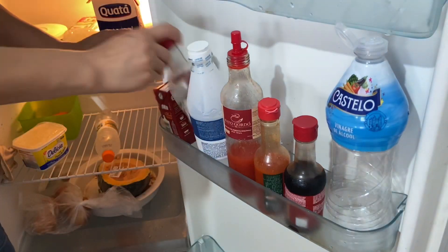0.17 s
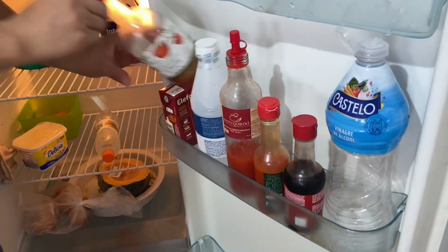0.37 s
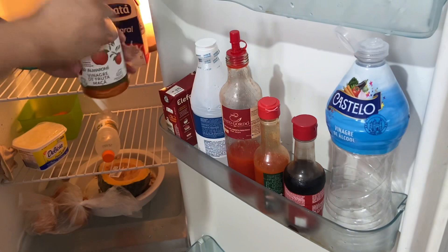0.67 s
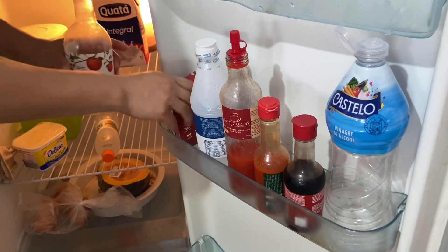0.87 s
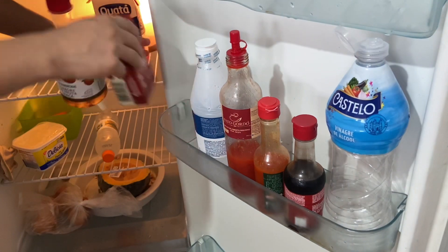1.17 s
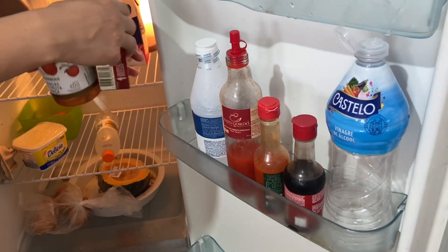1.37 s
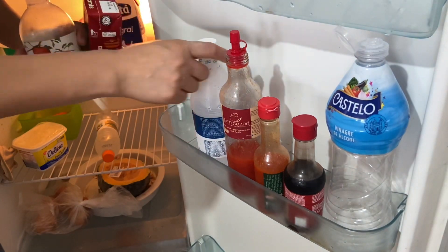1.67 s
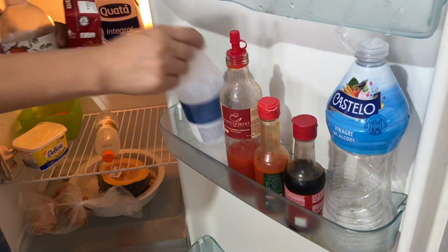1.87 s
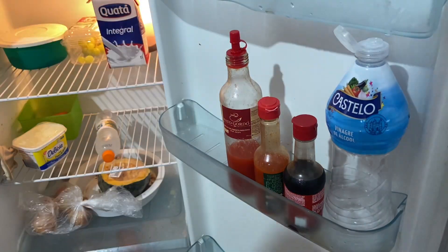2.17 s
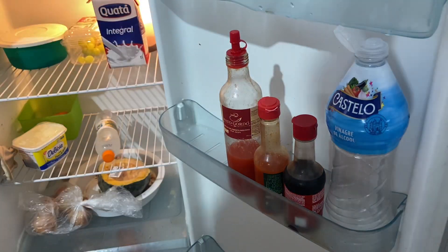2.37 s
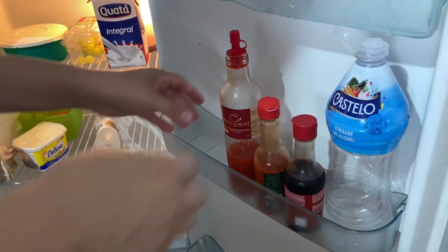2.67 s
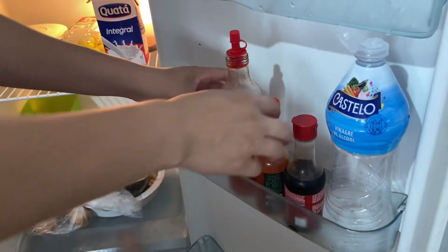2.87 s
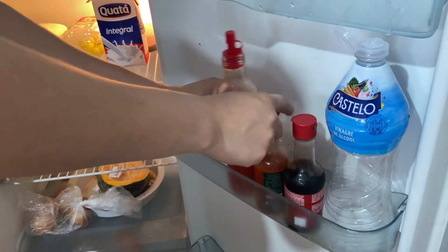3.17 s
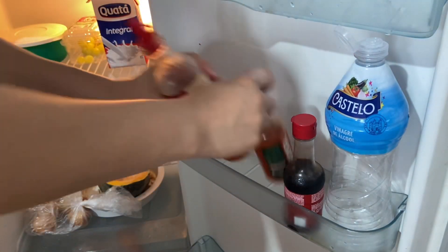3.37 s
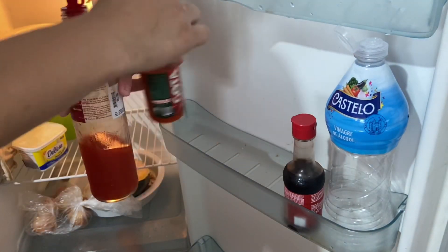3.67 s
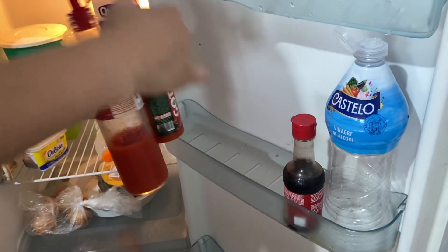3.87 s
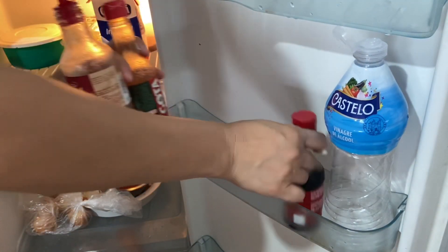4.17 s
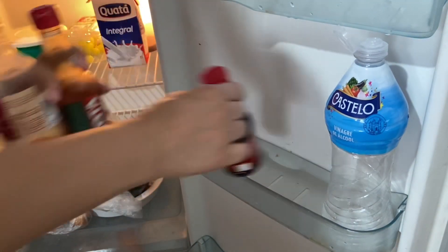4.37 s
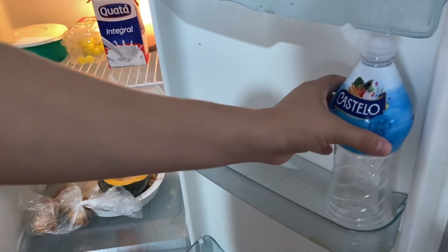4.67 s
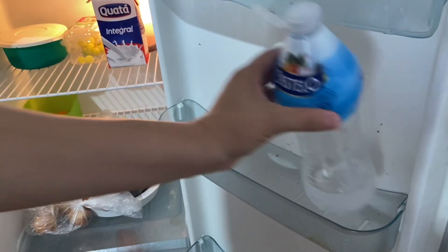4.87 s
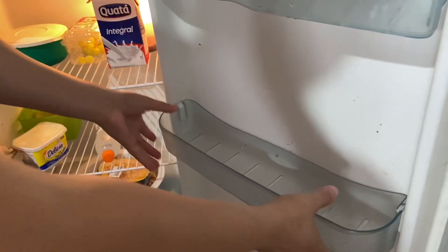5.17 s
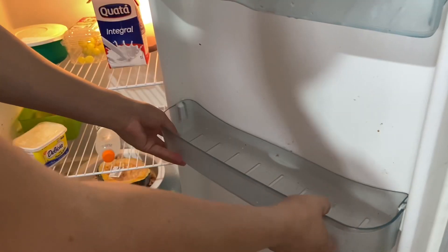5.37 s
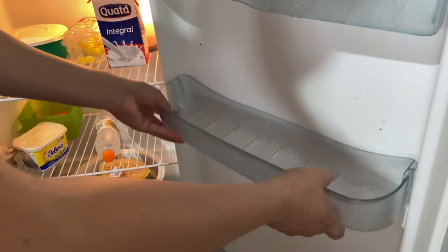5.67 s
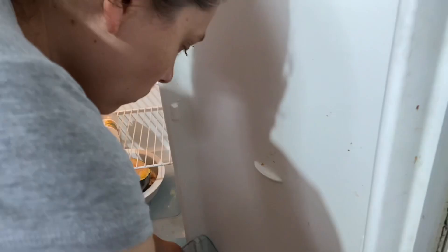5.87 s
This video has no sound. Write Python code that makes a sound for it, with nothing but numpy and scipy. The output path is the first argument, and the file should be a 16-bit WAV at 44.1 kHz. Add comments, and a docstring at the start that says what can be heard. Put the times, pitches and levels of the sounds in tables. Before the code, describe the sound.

Hands empty a refrigerator door rack: plastic knocks and scrapes, a brief glassy clink, then a loud crack as the rack comes loose.

```python
"""In a small tiled kitchen, hands empty the plastic rack of a refrigerator door: jars and bottles scrape out,
knock the rack and each other, two glass bottles clink, and at last the rack itself is worked loose.
Contacts are short forces driving resonances of door, rack and stiff plastic; glass is a sum of decaying sines.
Slides and squeaks are shaped noise, shoves leave the hollow door drumming in noise through its modes,
and a decaying noise tail answers the contacts and glass over a quiet floor."""
import sys
import numpy as np
from scipy import signal
from scipy.fft import rfft, irfft, next_fast_len
from scipy.io import wavfile
from scipy.ndimage import uniform_filter1d, map_coordinates

SR = 44100
rng = np.random.default_rng(int(sys.argv[2]) if len(sys.argv) > 2 else 0)


def unload_wav(signal):
    """Save mono or channel-first audio to the path in sys.argv[1] as 16-bit WAV at rate SR, clipped to [-1, 1]."""
    wavfile.write(
        sys.argv[1],
        SR,
        np.round(np.clip(np.atleast_2d(signal).T, -1, 1) * 32767).astype(np.int16),
    )


N = 265041

# steady murmur of the house, spectral shape: frequency_hz, density_db (relative, per Hz)
QUIET = [(15, -39), (25, -12.5), (49, 11.5), (71, -5), (214, -9), (382, -18), (682, -16.5), (1110, -28),
         (2970, -31), (8000, -41.5), (10400, -68), (17600, -120)]
QUIET_DB = -65  # dB, level about which the murmur wavers
# likeness of left and right in diffuse sound: frequency_hz, likeness (0 to 1)
ALIKE = [(60, 0.91), (180, 0.99), (550, 0.26), (1650, 0.072), (4970, 0.47), (15000, 0.51)]
# shoves after which the door shudders on: start_s, drumming_db, deep_rumble_db (re drumming)
SHOVES = [(.03, -60.5, 9), (.22, -56, 20), (.33, -52, 10), (.47, -50, -12), (0.622, -60, -13),
          (.96, -56, -11), (1.1, -38.5, -7.5), (1.42, -55.5, -4), (1.778, -52, 6), (1.898, -46, -9),
          (2.22, -45.5, 3), (2.62, -71, 11), (2.982, -49, 4), (3.13, -38.5, -19), (3.25, -55, -8),
          (3.5, -53.5, -4), (3.98, -74.5, 19), (4.2, -49, -6), (4.462, -73, 12.5), (4.601, -53, -2.5),
          (5.199, -54, 4.5), (5.36, -50, 6), (5.48, -42, 0), (5.69, -42, -11), (5.96, -32, -5.5)]
SHOVE_RISE, DRUM_FALL, DEEP_FALL = 310, 138, 61  # dB per second
# modes of the hollow door: frequency_hz, width_hz, level_db (relative)
DOOR = [(48.3, 11, -1), (77.3, 9.4, -3.5), (116.05, 12.7, 1), (190.7, 25.8, -4), (231.3, 29.5, -2.5),
        (317, 56, -8)]
# modes of the rack: frequency_hz, width_hz, level_db (relative)
RACK = [(352, 156, -6), (389.4, 148, 1), (523, 22.5, -0.5), (653.6, 76, 2.5), (775, 510, -1.5),
        (1190, 413, 2.5)]
# modes of stiff plastic: frequency_hz, width_hz, level_db (relative)
CRACK = [(1686, 810, 1), (2148, 707, 6), (2633, 850, 3), (3730, 2540, -4)]
# modes of the brittle edge: frequency_hz, width_hz, level_db (relative)
SNAP = [(6560, 1500, -4.5), (11060, 440, 1.5), (14800, 2300, -9)]
# things sliding along rack and hand: full_from_s, swell_s, held_s, label_rustle_db,
# rack_scrape_db (re rustle), skin_hiss_db (re rustle)
SLIDES = [(0.121, 0.14, 0.1, -45.5, 4, -7.5), (.31, .08, 0.011, -61, 16.5, -13),
          (0.528, 0.06, .03, -60.5, 1, -14), (1.07, 0.097, 0.018, -72, 19.5, -14.5),
          (1.62, 0.13, 0.23, -79.5, 0.5, -14), (1.88, 0.12, 0.092, -74, 13.5, -14),
          (2.049, 0.29, 0.06, -63, -4, -3.5), (2.199, .04, 0.042, -82, 21, -1),
          (2.478, 0.32, 0.14, -68, 2.5, -5), (2.838, 0.23, 0.16, -61, -8, 1.5),
          (3.14, 0.18, 0.18, -92, 21, -5), (4.168, 0.19, 0.021, -74, 18, -12),
          (4.27, 0.089, 0.12, -84, 11, -13), (4.58, .05, 0.066, -90.5, 23.5, 2),
          (4.76, 0.19, 0.35, -102, 22, 8), (5.19, .05, 0.08, -98.5, 15, -12),
          (5.319, 0.072, 0.062, -73.5, 15, -8), (5.438, 0.088, 0.1, -54.5, 2, -5.5),
          (5.56, 0.12, 0.083, -62.5, 4, -7), (5.671, 0.15, 0.11, -59.5, 3, -2),
          (5.92, 0.017, .1, -53, -5, -6.5)]
SWELL_DB, SLIDE_FALL = 40, 136  # dB risen in one swell time; dB per second of decay
# spectral shape of the rack scrape, before the plastic's modes: frequency_hz, density_db (relative, per Hz)
SCRAPE = [(150, -12), (250, -4), (462, -11), (854, -7.5), (1150, -13), (1520, -12.5), (2030, -23.5),
          (5000, -30.5), (6500, -54), (11000, -120)]
# spectral shape of the label rustle: frequency_hz, density_db (relative, per Hz)
RUSTLE = [(500, -120), (1000, -3), (2000, 6.5), (4000, 2), (6000, 0.5), (8000, 2.5), (11000, -84)]
# spectral shape of the skin hiss: frequency_hz, density_db (relative, per Hz)
HISS = [(5000, -120), (7000, -130), (10000, 12.5), (12000, 9), (15000, 4.5), (17000, -16)]
# glass and plastic singing as they slide: start_s, end_s, pitch_hz, width_hz (of one filter pass), level_db
SQUEAKS = [(0.054, 0.196, 1180, 260, -49), (0.462, 0.54, 1160, 61.5, -57.5),
           (1.58, 1.785, 2620, 456.5, -74), (2.782, 3.02, 1920, 205, -72), (4.252, 4.425, 2650, 300, -78.5),
           (4.282, 4.42, 3450, 200, -77), (4.294, 4.388, 5000, 297, -81), (4.481, 4.735, 5950, 400, -87),
           (4.787, 5.085, 967, 119, -77.5), (5.692, 5.848, 3000, 149, -63)]
# contacts: start_s, level_db (of the whole contact), rack_db, door_db, snap_db (all three re crack, before
# each part's fixed trim), favoured_rack_hz, favoured_door_hz, contact_t60_s (at least 0.003 is used)
KNOCKS = [(0.065, -45, 0.5, -12, -24, 910, 110, 0.21), (.1628, -33, 0.5, 2.5, -21.5, 290, 266, 0.073),
          (.179, -27.5, -1, 1.5, -22, 550, 102, 0.041), (0.2034, -44, 9, 15.5, -7, 665, 125, 0.041),
          (0.2337, -48.5, 15, 2, -13, 420, 117, 0.017), (0.311, -52, 3, -1, -15, 1100, 116, .03),
          (.328, -41, 4, -2, -21, 890, 116, 0.025), (.399, -37, -9, -7.5, 6.5, 380, 53.8, 0.012),
          (0.5289, -46.5, -7.5, -3.5, -10.5, 428, 70, 0.048),
          (0.597, -49, -3.5, -1.5, -2.5, 423, 221, 0.031), (.7147, -44, -26, -26, -12.5, 450, 46.4, 0.066),
          (.7904, -51.5, -36, -8, -11, 565, 49.3, 0.075), (.855, -56, -15, -3.5, -3, 300, 51.7, 0.056),
          (0.899, -57, 10.5, -29, -11, 630, 178, 0.11), (0.936, -53, 8, 4, -17, 408, 111, 0.038),
          (1.0191, -37.5, 7.5, 2.5, -15, 525, 161, 0.05), (1.0649, -44, -13, 6.5, -14.5, 299, 125, 0.058),
          (1.076, -41.5, 3.5, -2, -16, 516, 70.4, 0.1), (1.088, -52, -2, -14, -16, 700, 100, 0.023),
          (1.0942, -50, 11, 8, -38, 1050, 72.5, 0.075), (1.23, -53, 4, 5, -20, 650, 72.5, 0.04),
          (1.2623, -61.5, -25, -1, -39, 670, 82, .035), (1.4018, -48.5, 1, 1, -27, 586, 199, 0.063),
          (1.4134, -54, -21, -12, 16, 637, 171, 0.023), (1.7786, -43, -9, -8.5, -11.5, 303, 102, 0.098),
          (1.7923, -49.5, 6.5, -23, -55, 320, 139, 0.049), (1.858, -43, 5, -8, -30, 756, 213, 0.14),
          (1.868, -36, -5.5, -4.5, -1.5, 403, 175, 0.013), (2.0534, -62, 5, -13, 5.5, 1100, 45, 0.054),
          (2.195, -59, 12.5, 19.5, -20, 314, 192, .06), (2.179, -52, 11.5, 19, -23, 330, 108, 0.043),
          (2.39, -72, 3, -9, -4, 895, 100, .03), (2.455, -65, -13, -18, 5, 500, 99, 0.024),
          (2.4827, -48.5, -0.5, -6.5, -38, 1220, 66, 0.042), (2.5218, -52.5, -5.5, -26, -2, 295, 46, 0.041),
          (3.1132, -45.5, 2, -27, -23, 440, 100, 0.033), (3.124, -58, 17.5, 18.5, -13, 336, 107, 0.014),
          (3.225, -53.5, 11, 13, -44, 307, 237, 0.053), (3.2348, -62.5, 13, 21.5, -20, 312, 202, .024),
          (3.474, -74.5, 22, 23, -27, 327, 98, 0.2), (3.7958, -47.5, 4, -7, -6, 396, 254, 0.03),
          (3.8186, -53, -18, -2, -14.5, 484, 250, 0.12), (3.8311, -53, -3, -7, -3, 537, 248, 0.029),
          (4.1441, -58.5, -4, 6, -23, 327, 223, 0.094), (4.1873, -52, -4, 6, -14, 315, 202, 0.024),
          (4.2026, -61, 13, 19.5, -47, 348, 212, 0.022), (4.4214, -58, -16, 9.5, -13.5, 351.4, 45, 0.078),
          (4.453, -68, -20, 23.5, -2.5, 301, 48.4, 0.049), (4.5639, -69, 13.5, 17, -28, 303, 280, .12),
          (4.6105, -64.5, 10.5, 6, -23, 470, 131, 0.084), (4.645, -63.5, 6.5, 1, -25, 1080, 200, 0.026),
          (4.6649, -62, 7.5, 7.5, -38, 430, 54, .04), (5.1727, -73.5, 23, 12, -17, 312, 52.7, 0.21),
          (5.3013, -48, 1.5, -5, -19.5, 386, 110, 0.18), (5.3186, -44.5, 4, -1, -5, 670, 117, 0.014),
          (5.3404, -50.5, 7, -8, -28, 303, 102, 0.068), (5.387, -49, -19, -12, -4.5, 400, 100, 0.047),
          (5.394, -54, 25.5, 16.5, -20, 390, 96, .023), (5.4233, -45.5, 14, 9, -8, 456, 153, 0.2),
          (5.4389, -24.5, -8, -4, -17.5, 357, 152, 0.035), (5.4834, -49.5, 7, 21, -8, 400, 112, 0.0158),
          (5.913, -36, 4, 11.5, -16.5, 705, 77, 0.14), (5.9536, -43.5, -5, -5, -27.5, 370, 85.6, 0.36),
          (5.9833, -41, -2, 9, -20, 305, 115, 0.24)]
CRACK_HZ, BRIGHTER = 1920, 0.06  # Hz of a crack at rack 0 dB; octaves up per dB of weaker rack
# where the hands work: time_s, left_minus_right_db
PLACE = [(0, -.5), (1.1, 0), (1.25, 3), (2.2, 0), (3.1, 3), (3.8, 1.5), (4.1, -1), (6, 0.5)]
# reverberation of the kitchen: frequency_hz, t60_s
KITCHEN = [(100, 0.73), (700, 0.38), (5000, 0.2), (14000, 0.19)]
# a bottle touches its neighbour: start_s, level_db (before each mode's level)
TAPS = [(3.114, -39.5)]
# modes of the touched bottle: pitch_hz, level_db (relative), t60_s
NEIGHBOUR = [(1672, 7.5, 0.027), (3110, -22, 0.048), (5690, -47, 0.17), (6600, -23, 0.046)]
# two bottles meet and rebound: start_s, level_db (before each mode's level)
CLINKS = [(3.794, -47), (3.818, -72), (3.832, -53.5)]
# modes of the clinking bottles: pitch_hz, level_db (relative), t60_s
GLASS = [(460, 13.5, 0.057), (524, -5, 0.2), (821, 0.5, 0.18), (880, -3, 0.11), (2060, 7.5, 0.03),
         (2280, -13, 0.17), (2763, 6, 0.18), (2822, -5, 0.41), (6300, -2, 0.068), (7140, 1, 0.029),
         (7180, -8, 0.17)]
# balance of the microphone pair: frequency_hz, left_minus_right_db
LEAN = [(60, 0.5), (240, -1.5), (950, -0.5), (3770, 2), (15000, -0.5)]
TOP_HZ = 15900  # band limit


def amp(db):
    """Decibel law: the amplitude gain of a level in dB."""
    return 10 ** (np.asarray(db) / 20)


def unit(x):
    """Normalisation of power: x at rms 1."""
    return x / np.sqrt(np.mean(x ** 2) + 1e-20)


def along(points, hz):
    """Interpolation of (Hz, value) points on a logarithmic frequency axis."""
    f, v = np.transpose(points)
    return np.interp(np.log(hz + 1), np.log(f + 1), v)


def wobble(rate):
    """Slow random modulation: a smooth curve through random knots, rate of them a second."""
    knots = rng.standard_normal(int(N * rate / SR) + 4)
    return map_coordinates(knots, [np.arange(N) * rate / SR])


def filtered(x, response):
    """Linear filtering: the spectrum of x times a complex response of frequency."""
    n = x.shape[-1]
    m = next_fast_len(n + SR // 4)
    return irfft(rfft(x, m) * response(np.fft.rfftfreq(m, 1 / SR)), m)[..., :n]


def unit_power(response):
    """Normalisation of a response so that it keeps the rms of white noise."""
    return response / np.sqrt(np.mean(np.abs(response) ** 2))


def body(modes):
    """Modal superposition: causal resonances of alternating sign, summed and brought to unit power."""
    def response(f):
        total = 0
        for k, (c, w, db) in enumerate(modes):
            resonance = 1j * f * w / (c * c - f * f + 1j * f * w)
            total = total + (-1) ** k * amp(db) * resonance
        return unit_power(total)
    return response


def favoured(modes, hz, fall_db):
    """Selective excitation: modes weakened by fall_db for the squared octave that they lie from hz."""
    return [(c, w, db - fall_db * np.log2(c / hz) ** 2) for c, w, db in modes]


def near(modes, hz, sharpness):
    """Selective excitation: the modes seen through one broad resonance at hz, applied twice."""
    focus = body([(hz, hz / sharpness, 0)])
    return lambda f: unit_power(body(modes)(f) * focus(f) ** 2)


def spread(pair, colour):
    """Partial coherence: unrelated signals as mid and side give a left and right whose likeness follows pitch."""
    def mid_side(hz):
        turn = np.arccos(np.clip(along(ALIKE, hz), -1, 1)) / 2
        return colour(hz) * [np.cos(turn), np.sin(turn)]
    mid, side = filtered(pair, mid_side)
    return unit(np.array([mid + side, mid - side]))


def grit(grain_db, rate):
    """Stick-slip friction: two noises share a level that varies from grain to grain."""
    level_db = grain_db * wobble(rate) + grain_db / 2 * wobble(rate / 8)
    return amp(level_db) * rng.standard_normal((2, N))


def gestures(peak_s, held_s, db, rise, fall):
    """Energy addition: gestures swell, hold and die at steady dB a second, and their powers add."""
    t = np.arange(0, N + 64, 64) / SR
    before = np.maximum(peak_s - t[:, None], 0)
    after = np.maximum(t[:, None] - peak_s - held_s, 0)
    level = db - rise * before - fall * after
    return np.interp(np.arange(N) / SR, t, np.sqrt(np.sum(amp(level) ** 2, axis=1)))


def patchy(x, depth_db):
    """Time-frequency modulation: the colour of a noise shifts in random patches."""
    z = signal.stft(x, nperseg=256)[2]
    field = rng.standard_normal(z.shape[1:])
    field = uniform_filter1d(uniform_filter1d(field, 4, 0), 8, 1)
    return signal.istft(z * amp(depth_db * unit(field)), nperseg=256)[1][:, :N]


def floor():
    """Stationary background noise: the steady murmur of the house, its level wavering slightly."""
    level = amp(QUIET_DB + 0.45 * wobble(5.33))
    return level * spread(rng.standard_normal((2, N)), lambda hz: amp(along(QUIET, hz)))


def shudder():
    """Modal damping: each shove sets the hollow door drumming, and its deepest modes last longer."""
    s, drum_db, deep_db = np.transpose(SHOVES)
    deep_modes = body(favoured(DOOR, hz=57.8, fall_db=12))
    drum_modes = body(favoured(DOOR, hz=155, fall_db=10.0))
    deep = spread(grit(grain_db=3, rate=30), deep_modes)
    drum = spread(grit(grain_db=3.0, rate=45), drum_modes)
    deep = deep * gestures(s, 0, drum_db + deep_db, SHOVE_RISE, DEEP_FALL)
    return deep + drum * gestures(s, 0, drum_db, SHOVE_RISE, DRUM_FALL)


def handling():
    """Sliding friction: pulling things out scrapes the rack and rustles and hisses skin on labels."""
    s, swell, held, db, scrape_db, hiss_db = np.transpose(SLIDES)
    rise = SWELL_DB / np.maximum(swell, .005)

    def stroke(level_db):
        return gestures(s, held, level_db, rise, SLIDE_FALL)

    slips = patchy(grit(grain_db=3.5, rate=400), depth_db=3.5)
    # the scrape sounds through the plastic's modes, narrow ones strongest
    ridges = body([(c, w, 10 * np.log10(c / w)) for c, w, _ in RACK + CRACK])
    scrape = spread(slips, lambda hz: amp(along(SCRAPE, hz)) * (6.7 + np.abs(ridges(hz))))
    skin = grit(grain_db=1.5, rate=550)
    rustle = spread(patchy(skin, depth_db=1.5), lambda hz: amp(along(RUSTLE, hz)))
    hiss = spread(skin, lambda hz: amp(along(HISS, hz)))
    return stroke(db + scrape_db) * scrape + stroke(db) * rustle + stroke(db + hiss_db) * hiss


def squeaks():
    """Frictional singing: narrow noise of wandering pitch swells and fades over each slide."""
    out = np.zeros((2, N))
    for start, end, hz, width, db in SQUEAKS:
        at = slice(round(start * SR), round(end * SR))
        size = at.stop - at.start
        ring = body([(hz, width, 0)])
        tone = filtered(rng.standard_normal(SR // 2), lambda f: ring(f) ** 2)
        # the noise is read at a varying speed, so its pitch wanders
        knots = np.linspace(1, 1 + 12 * (end - start), size)
        speed = 1 + .02 * map_coordinates(rng.standard_normal(8), [knots])
        tone = map_coordinates(tone, [2000 + np.cumsum(speed)])
        out[:, at] += amp(db) * signal.windows.tukey(size, .6) * unit(tone)
    return out


def knocks():
    """Impact excitation: a blow, a soft push and a chatter of force drive door, rack and stiff plastic."""
    out, t = np.zeros((2, N + SR)), np.arange(SR // 3) / SR
    blow = np.exp(-t / .00006)  # the first clean touch
    push = np.exp(-t / 0.00084)  # the door feels one soft shove
    edge_rise = 1 - np.exp(-t / 0.0013)  # the brittle edge builds up later
    for s, db, rack_db, door_db, snap_db, rack_hz, door_hz, t60 in KNOCKS:
        crack_hz = CRACK_HZ * 2 ** (-BRIGHTER * rack_db)
        pan_db = np.interp(s, *np.transpose(PLACE))
        # bounces of random strength, 100 samples (about 2 ms) apart
        bounces_db = np.repeat(rng.standard_normal(len(t) // 100 + 1), 100)[:len(t)]
        rattle = amp(4 * bounces_db - 2)
        envelope = amp(-60 * t / max(t60, .003)) * (1 - np.exp(-t / 0.00048))
        chatter = envelope * rattle * rng.standard_normal(len(t))
        door = filtered(push, body(favoured(DOOR, door_hz, fall_db=7.5)))
        rack = filtered(chatter + 12 * blow, near(RACK, rack_hz, sharpness=1.6))
        crack = filtered(chatter + 5 * blow, near(CRACK, crack_hz, sharpness=0.5))
        snap = filtered(chatter * edge_rise, body(SNAP))
        plastic = amp(rack_db - 11.5) * rack + amp(-8.0) * crack + amp(snap_db + 3.5) * snap
        sides = amp([[pan_db / 2], [-pan_db / 2]])
        contact = amp(door_db - 0.5) * door + sides * plastic
        out[:, round(s * SR):][:, :len(t)] += amp(db) * contact
    return out[:, :N]


def kitchen(x):
    """Reverberant decay: noise in which each frequency dies at its own speed answers the source."""
    hz, t, z = signal.stft(rng.standard_normal((2, SR // 2)), SR, nperseg=256)
    decay = amp(-60 * t / along(KITCHEN, hz)[:, None])
    tail = signal.istft(z * decay, SR, nperseg=256)[1]
    tail = tail / np.linalg.norm(tail[0])
    late = np.pad(x, (200, 0))[None]  # the answer starts 200 samples late
    wet = signal.fftconvolve(late, tail, axes=1)[:, :N]
    # long waves reach both ports alike
    wet += filtered(wet[::-1] - wet, lambda f: 1 / (1 + (f / 300) ** 2)) / 2
    # the echo is thinned in the bass, so the door's low ringing stays clear
    return filtered(wet, lambda f: 1j * f / (250 + 1j * f))


def ringing(blows, modes):
    """Free vibration: each blow rings the glass modes anew; the holding hand and the liquid make them waver."""
    out, t = np.zeros(N + SR), np.arange(SR // 2) / SR
    onset = 1 - np.exp(-t / 0.0013)
    for s, db in blows:
        for hz, level, t60 in modes:
            chance_db = 1.5 * rng.standard_normal()
            drift = .018 * np.cumsum(rng.standard_normal(len(t)))  # radians
            decay = amp(level + chance_db - 60 * t / t60)
            ring = decay * np.sin(2 * np.pi * hz * t + drift)
            out[round(s * SR):][:len(t)] += amp(db) * ring * onset
    return out[:N]


def scene():
    """Superposition: contacts and glass with their echo, over handling, shudder, squeaks and floor."""
    hits = knocks()
    glass = ringing(CLINKS, GLASS) + ringing(TAPS, NEIGHBOUR)
    echo = kitchen(amp(-0.5) * hits.mean(axis=0) + amp(-3.5) * glass)
    placed_glass = glass * amp([[1.2], [-1.2]])  # toward the left
    return hits + placed_glass + echo + shudder() + handling() + squeaks() + floor()


def record(dry):
    """Stereo time and level differences: the left port leads slightly, levels lean with pitch, the top is cut."""
    side = np.array([[.5], [-.5]])
    lead = 2e-5  # s, left ahead of right

    def ports(hz):
        balance = amp(side * along(LEAN, hz))
        return (hz < TOP_HZ) * balance * np.exp(2j * np.pi * hz * side * lead)

    return filtered(dry, ports)


dry = scene()
out = record(dry)
unload_wav(out)
```